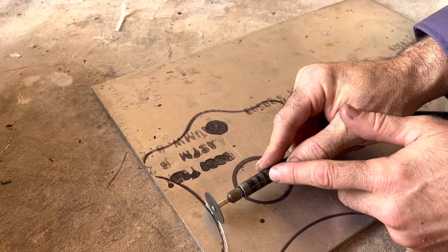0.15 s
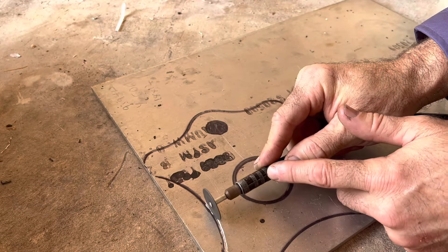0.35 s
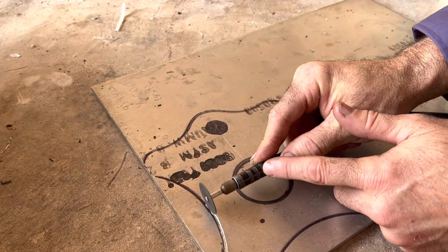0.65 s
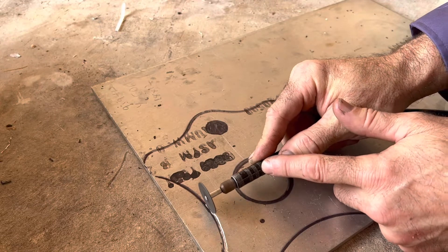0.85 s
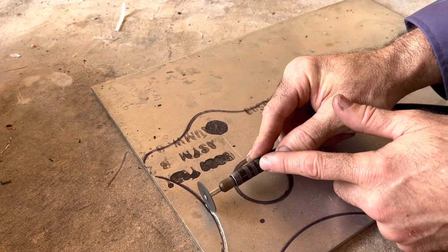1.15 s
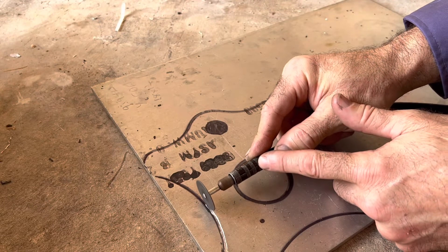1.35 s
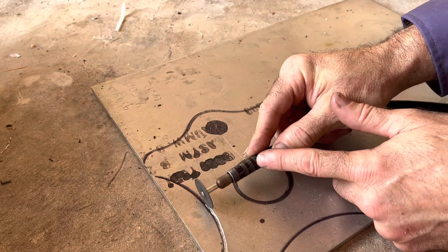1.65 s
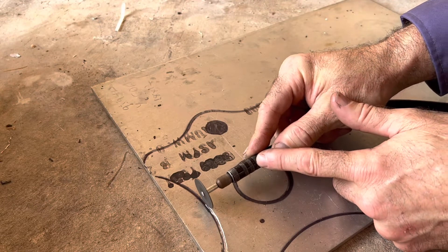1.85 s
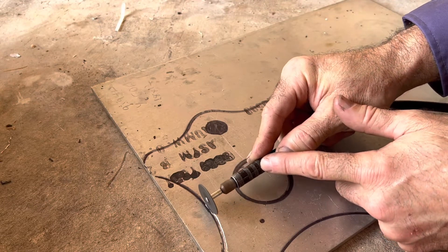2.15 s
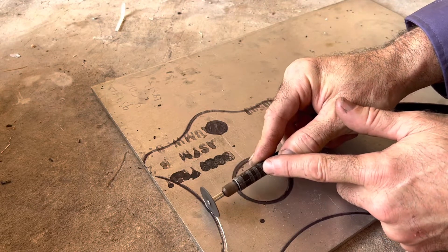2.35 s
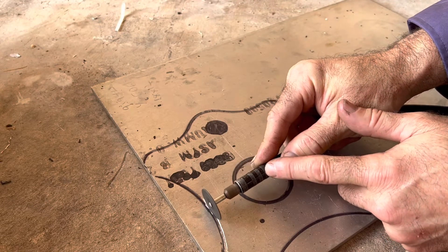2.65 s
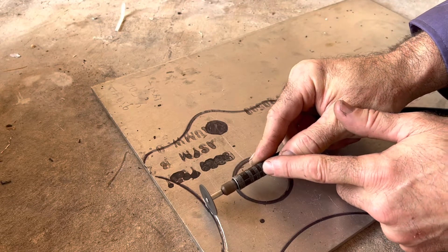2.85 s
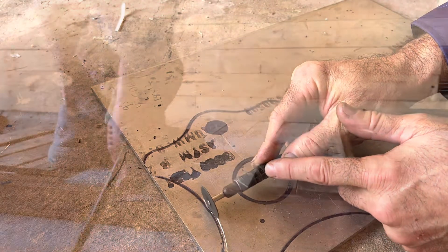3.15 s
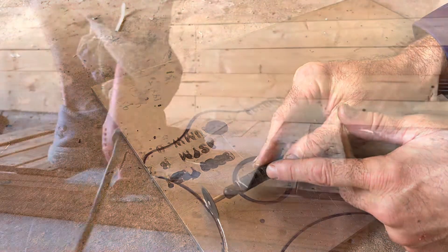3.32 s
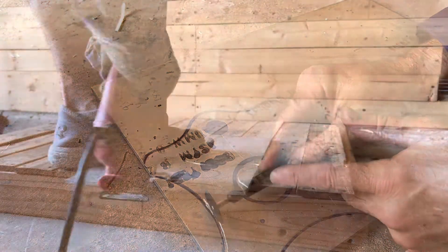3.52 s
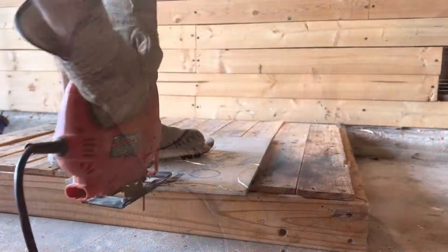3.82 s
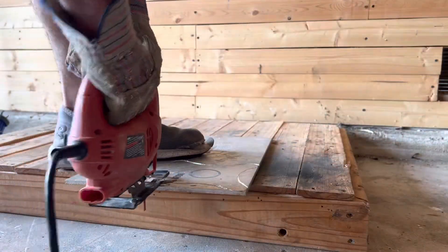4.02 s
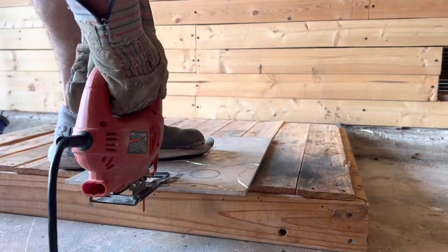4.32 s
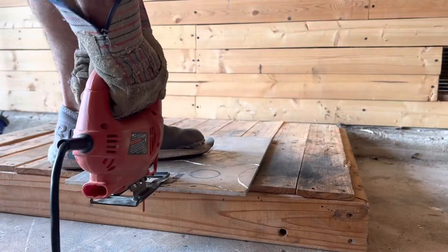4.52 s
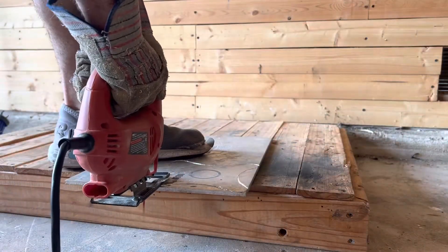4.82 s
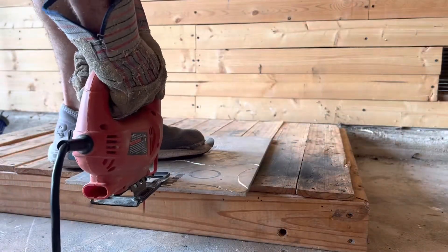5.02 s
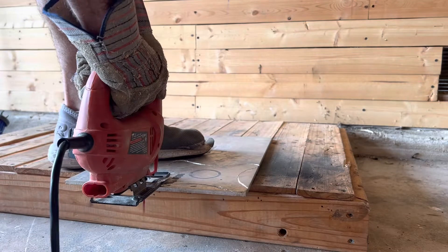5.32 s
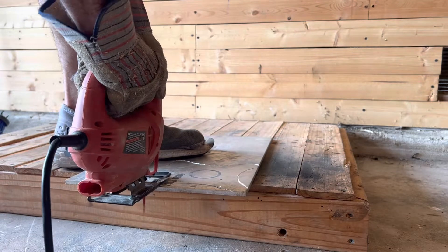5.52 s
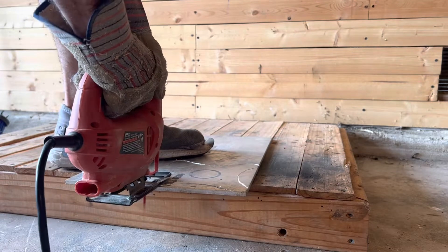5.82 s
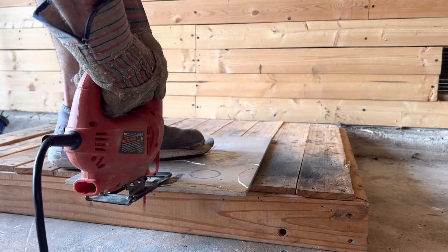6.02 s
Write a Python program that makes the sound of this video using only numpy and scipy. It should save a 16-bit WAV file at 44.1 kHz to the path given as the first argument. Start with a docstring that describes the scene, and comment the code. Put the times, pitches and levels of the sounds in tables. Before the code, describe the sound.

A rotary tool cuts metal for over three seconds: steady bright hiss, metallic ringing and a whine that wobbles under pressure. It dissolves into low room rumble, dull thuds and a short shoe scrape. A jigsaw then bursts in, speeding up into a coarse, rattling buzz with squawks and slaps, close by in a wooden room.

```python
"""A small wooden workshop, heard from close by through a phone's pair of microphones, over a low room rumble.
A rotary tool's disc grinds a groove in an aluminium sheet: strikes once a turn, grit noise and ringing modes
make it whine and chatter, then fade away. A jigsaw is set on the sheet, which lies on a wooden pallet: noise
bursts make its shoe bump and slide and its trigger click, then blows and rasping noise follow its strokes."""
import sys
import numpy as np
from scipy import signal
from scipy.fft import rfft, irfft, next_fast_len
from scipy.io import wavfile
from scipy.ndimage import uniform_filter1d

SR = 44100
rng = np.random.default_rng(int(sys.argv[2]) if len(sys.argv) > 2 else 0)


def master_out(mix):
    """Clip the mix to full scale and print it as 16-bit PCM to the path in sys.argv[1]."""
    frames = np.transpose(np.atleast_2d(mix))
    ceiling = np.clip(frames, -1, 1)
    pcm = np.round(ceiling * 32767).astype(np.int16)
    wavfile.write(sys.argv[1], SR, pcm)


N = 272097
T = np.arange(N) / SR  # seconds
SIZE = next_fast_len(N + SR // 2, True)  # transform length, with room for tails
HZ = np.maximum(np.arange(SIZE // 2 + 1) * SR / SIZE, 1)


def undb(db):
    """Decibels to gain."""
    return 10 ** (np.asarray(db) / 20)


def unit(x):
    """Scale to rms 1."""
    return x / np.sqrt(np.mean(x ** 2))


def curves(rows):
    """One value a sample for each column of a table after its first, the seconds."""
    s, *columns = np.transpose(rows)
    return [np.interp(T, s, column) for column in columns]


def shape(points):
    """Gain at each frequency from (Hz, dB) points."""
    hz, db = np.transpose(points)
    return undb(np.interp(np.log(HZ), np.log(hz), db))


def mode_response(hz, width):
    """One damped mode with gain 1 at its peak."""
    return 1 / (1 + 1j * hz / width * (HZ / hz - hz / HZ))


def resonances(modes):
    """Damped modes added to a flat response."""
    return 1 + sum(undb(db) * mode_response(hz, width) for hz, width, db in modes)


def filtered(x, response):
    """Pass a sound through a frequency response."""
    return irfft(rfft(x, SIZE) * response, SIZE)[..., :N]


def noise():
    """White noise."""
    return rng.standard_normal(N)


def walk(rate):
    """Slow chance with spread near 1, drawn anew about rate times a second and smoothed."""
    k = max(int(SR / rate), 1)
    steps = np.repeat(noise()[:N // k + 1], k)
    return 1.36 * uniform_filter1d(uniform_filter1d(steps, k), k)[:N]


def pulses(turns):
    """A click each time the phase completes a turn, shared between two samples."""
    at = np.flatnonzero(np.diff(np.floor(turns)) > 0)
    late = (turns[at + 1] % 1) / (turns[at + 1] - turns[at])
    out = np.zeros(N)
    out[at], out[at + 1] = late, 1 - late
    return out


def swell(turns, depth):
    """A smooth bump once a turn; rms 1."""
    return unit(np.exp(depth * np.cos(2 * np.pi * turns)))


def fade(start, end):
    """Goes from 0 at start to 1 at end; falls over time where end comes first."""
    return np.clip((T - start) / (end - start), 0, 1)


def gate(start, length, edge):
    """Rises, holds and falls; each edge takes edge seconds."""
    rise = fade(start - edge / 2, start + edge / 2)
    return rise * (1 - fade(start + length - edge / 2, start + length + edge / 2))


def lifts(events, edge):
    """For each level column of (start, length, ..) rows, the summed lift over time."""
    return sum(np.outer(values, gate(start, length, edge)) for start, length, *values in events)


def burst(start, t60):
    """A spray of contact noise that dies by 60 dB in t60 seconds."""
    age = np.maximum(T - start, 0)
    return noise() * (T >= start) * np.exp(-np.log(1000) * age / t60)


def dispersed(x, spread=.2):
    """Bending waves in a sheet run faster at high pitch, so a click arrives as a short falling chirp."""
    return filtered(x, np.exp(-2j * np.pi * spread * np.sqrt(HZ)))


def partial(turns, waver_db):
    """A tone that wavers about rms 1."""
    return np.sqrt(2) * np.sin(2 * np.pi * (turns + rng.random())) * undb(waver_db * walk(14))


# Colour of the room's rumble. Each row: frequency in Hz, relative level in dB.
ROOM_COLOUR = [(20, -26), (45, -3.5), (70, 3), (130, -2), (220, -11.5), (500, -15), (1500, -26),
               (5000, -30.5), (16000, -55)]
# How loud the room stands behind the tools. Each row: time in seconds, level in dB.
ROOM_LEVEL = [(0, -60.5), (3.0, -61.5), (3.5, -48.5), (6.17, -58)]


def rumble():
    """Low room noise, nearly the same on both sides."""
    air = noise() + 0.3 * np.array([noise(), noise()])
    return unit(filtered(air, shape(ROOM_COLOUR))) * undb(curves(ROOM_LEVEL)[0] + 0.52 * walk(6.06))


def workshop(x, wet_db, t60, pan_db):
    """Wooden walls send a short unrelated tail to each side; deep bass and top treble stay direct."""
    tails = np.array([burst(.003, t60) for _ in range(2)])
    tails /= np.sqrt(np.sum(tails ** 2, axis=1, keepdims=True))
    wet = undb(wet_db) * shape([(100, -20.5), (400, 0.0), (1200, 1.5), (2500, 2.0),
                                (7200, -3.0), (8200, 10.0), (12000, -67)])
    sides = undb(np.array([[pan_db], [-pan_db]]) / 2)  # pan_db: left minus right
    return filtered(x, (1 + wet * rfft(tails, SIZE)) / np.sqrt(1 + wet ** 2 / 2)) * sides


# The steel shoe on the sheet. Each row: mode in Hz, width in Hz, relative level in dB.
SHOE_MODES = [(356, 22, 19), (712, 20, 16), (1061, 13, 10)]
# The shoe lands squarely and rings. Each row: start in seconds, peak in dB before the room, upper edge in Hz.
CLANGS = [(3.331, -23, 2000), (4.674, -6, 400), (4.728, -14, 400), (4.845, -19, 410), (5.972, -17, 400)]


def clang(start, edge_hz):
    """One clean ring of the shoe's modes; a softer landing holds back the upper ones."""
    age = np.maximum(T - start, 0)
    ring = 0
    for hz, width, db in SHOE_MODES:
        strength = undb(db) / np.hypot(1, (hz / edge_hz) ** 2)
        ring = ring + strength * np.exp(-np.pi * width * age) * np.sin(2 * np.pi * hz * age)
    ring = filtered(ring, 1 / (1 + 170 / (1j * HZ)) ** 2)  # the small shoe radiates little deep bass
    return ring / np.abs(ring).max()


def clangs():
    """All the shoe's rings, each at its own peak level."""
    return sum(undb(db) * clang(start, edge_hz) for start, db, edge_hz in CLANGS)


# The saw bumps on the sheet.
# Each row: start in seconds, peak in dB before the room, ring time in seconds, upper edge in Hz.
BUMPS = [(3.196, -37, .12, 349.7), (3.28, -23.5, 0.21, 300), (3.331, -20.5, 0.16, 700),
         (3.377, -27, 0.15, 200), (3.515, -38.5, .15, 201.6), (3.771, -33.5, 0.036, 650),
         (3.8, -35, 0.13, 450), (4.16, -34.5, 0.035, 550), (4.33, -40.5, 0.071, 900),
         (4.509, -41.5, 0.14, 500), (4.589, -26, 0.22, 504)]
# Colour of a bump. Each row: frequency in Hz, relative level in dB.
BUMP_COLOUR = [(20, -30), (45, -23), (90, -12), (150, 11), (300, -9.5), (700, -1), (1100, -0.5), (3000, 14)]
# Shoe and trigger clicks. Each row: start in seconds, relative level in dB.
CLICKS = [(3.499, -28.5), (4.103, -35), (4.505, -39), (4.603, -30)]
# The shoe slides on the sheet.
# Each row: start in seconds, length in seconds, level in dB, rise and fall time in seconds.
SLIDES = [(3.848, 0.51, -57.5, 0.045), (4.03, 0.06, -45, 0.052), (4.106, 0.068, -32.5, 0.01),
          (4.134, 0.077, -59, .08), (4.362, 0.29, -59, .05)]
# Colour of slides and clicks. Each row: frequency in Hz, relative level in dB.
SCRAPE_COLOUR = [(200, -11), (700, -11), (2000, 0.5), (4000, -7), (6000, -2.5), (9000, 3), (12000, -11.5),
                 (16000, -7.5)]


def handling(click_t60=0.011, click_db=3):
    """Noise bursts ring the shoe as the saw bumps and clicks; gated noise scrapes as it slides."""
    body, scrape, bumps = shape(BUMP_COLOUR) * resonances(SHOE_MODES), shape(SCRAPE_COLOUR), 0
    for start, db, t60, edge_hz in BUMPS:
        softness = 1 / (1 + 1.4j * HZ / edge_hz - (HZ / edge_hz) ** 2)
        bump = filtered(burst(start, t60), body * softness)
        bumps = bumps + undb(db) * bump / np.abs(bump).max()
    clicks = sum(undb(db + click_db) * burst(start, click_t60) for start, db in CLICKS)
    pushes = sum(undb(db) * gate(start, length, edge) for start, length, db, edge in SLIDES)
    slide = unit(filtered(noise() * undb(2.0 * walk(400)), scrape)) * pushes
    return bumps + slide + filtered(clicks, scrape)


# The blade squawks, mostly lower as the cut goes on. Each row: start in seconds, length in seconds,
# first pitch in Hz, last pitch in Hz, rate of its roughness in Hz, level in dB against the rasp.
SQUAWKS = [(4.651, 0.039, 1400, 1484, 150, -4), (4.7, 0.088, 2210, 2886, 451, -6),
           (4.776, .014, 2820, 2880, 100, 0), (4.808, 0.013, 3000, 3010, 100.3, 0),
           (4.82, .08, 2935, 2745, 600, -9), (4.935, .14, 1950, 2145, 449.6, -3.5),
           (5.054, 0.018, 2150, 2186, 150, 1), (4.95, 0.22, 850, 876, 100, -8.5),
           (5.16, 0.14, 2138, 2000, 649, -3.5), (5.2, .17, 1300, 1230, 299.3, -3.5),
           (5.3, .2, 1947, 1752, 499, -12), (5.33, 0.16, 1080, 979, 349.4, -4.5),
           (5.37, .12, 560.6, 601, 150, -7.5), (5.52, .11, 826, 718, 299, -3),
           (5.724, .24, 901, 912, 60.03, -6.5)]


def squawks(bite, flutter=1.68, rough=0.62, edge_s=0.051):
    """Short, rough, gliding tones of the flexing blade, pulsing with its strokes."""
    out = 0
    for start, length, first_hz, last_hz, rate, db in SQUAWKS:
        cycles = np.cumsum(np.interp(T, [start, start + length], [first_hz, last_hz])) / SR
        tone = np.sin(2 * np.pi * cycles + flutter * walk(rate))
        tone = unit(bite * (1 + rough * walk(rate)) * tone)
        out = out + tone * undb(db) * gate(start, length, min(edge_s, length / 2))
    return out


# The geared motor's whine. Each row: multiple of its shaft rate, level in dB at normal feed.
MOTOR_ORDERS = [(6, -34), (12, -34)]


def motor_whine(shaft, bite, flutter=0.2, waver_db=2):
    """Tones of the motor, gliding with its speed and shaken by each stroke."""
    out = 0
    for order, db in MOTOR_ORDERS:
        tone = partial(round(order) * shaft + flutter * walk(90), waver_db)
        out = out + undb(db) * unit(bite * tone)
    return out


# Low shaking of the saw. Each row: multiple of the stroke rate, relative level in dB.
SHAKE_ORDERS = [(2, -4.5), (3, -1.5), (4, -1), (5, 1), (6, -4), (7, -6)]


def shaking(strokes):
    """Harmonics of the stroke rate, each wavering in level and phase; rms 1."""
    out = 0
    for order, db in SHAKE_ORDERS:
        phase = 2 * np.pi * (round(order) * strokes + rng.random()) + 0.5 * walk(25)
        out = out + undb(db + 3.5 * walk(20)) * np.sin(phase)
    return unit(out)


# Saw speed. Each row: time in seconds, strokes per second in Hz.
STROKE_RATE = [(4.6, 24.73), (4.7, 28.5), (4.914, 36.9), (5.084, 41.2), (5.22, 41.25), (5.346, 40.85),
               (5.592, 36.8), (5.722, 36.9), (5.92, 36.7), (6.17, 35.8)]
# How hard the saw is fed into the sheet. Each row: time in seconds, feed in dB.
FEED = [(4.65, 1.5), (5.1, 0), (5.23, 1), (5.55, -0.8), (5.8, -4.5), (6.12, -6.5)]
# The blade snags and the saw jolts.
# Each row: start in seconds, length in seconds, lift of the knock in dB, lift of the rasp in dB.
JOLTS = [(4.668, 0.032, 4.5, -2), (4.73, 0.046, 4, -3), (5.535, 0.103, 5, 0.5), (5.64, 0.14, 4, 0),
         (5.92, 0.051, 3, 3.5), (6.15, .04, 2, 0)]
# The sheet jumps and slaps the pallet. Each row: start in seconds, relative level in dB.
SLAPS = [(4.791, -5), (4.822, -6), (4.852, -5), (4.879, 0.5), (4.908, -0.5), (4.934, -5), (5.012, -9),
         (5.457, -4), (5.479, -6), (5.5308, 0), (5.61, -3), (5.638, -1.5)]
# Colours of the saw's knock, rasp and chip hiss. Each row: frequency in Hz, relative level in dB.
KNOCK_COLOUR = [(20, -65), (50, -44), (85, -13), (125, -8), (200, 2), (280, 2), (450, 7), (620, -2),
                (1000, -5), (2500, -24), (6000, -55)]
RASP_COLOUR = [(20, -64), (300, -10), (550, -2), (900, -9.5), (1600, -5.5), (2200, -4), (3000, -5),
               (3450, -8), (3800, -12), (6000, -28), (12000, -31)]
CHIP_COLOUR = [(1500, -17), (3300, -5), (4100, -2), (5000, -1.5), (5800, 0), (7600, -4.5), (9000, -2),
               (10500, -3), (12000, -12.5), (16000, -20.5)]
# Sheet and pallet under the saw. Each row: mode in Hz, width in Hz, level in dB against the flat response.
BENCH_MODES = [(184, 17.6, 16.5), (355.6, 15, 15), (677, 41, -16), (910, 115, 6.5), (990, 10, -23.5),
               (1293, 117, 3.5), (1780, 50, -3), (2080, 140, -2.5), (2820, 180, -6), (3385, 86, 0.5),
               (6630, 110, -5)]
SLAP_T60_S = 0.038
FREE_HZ, LABOUR_HZ = 44.34, 8.2  # free-running stroke rate; drop at which the saw labours fully
FIRST_STROKE, MOTOR_RATIO = .77, 7.75  # starting phase in strokes; motor turns per stroke
# rasp, hiss and shake at normal feed (shake also at free speed); knock when labouring fully
RASP_DB, KNOCK_DB, HISS_DB, SHAKE_DB = -18.5, -25.5, -23.5, -28.5
HISS_PER_FEED, SHAKE_PER_FEED = 1, 1.5  # dB per dB of feed


def jigsaw(back_db=-3, rattle_db=2, both_bite=0.21, up_bite=0.25, grain_db=0.84, lumps_db=1.0,
           free_knock_db=-12, jolt_edge_s=0.0097, gear_db=-8, clack_db=-15, repeat_db=-5):
    """The blade knocks at both ends of its stroke and its teeth rasp in between; the geared motor buzzes along."""
    (stroke_hz,), (feed,) = curves(STROKE_RATE), curves(FEED)
    knock_lift, rasp_lift = lifts(JOLTS, jolt_edge_s)
    strokes = FIRST_STROKE + np.cumsum(stroke_hz) / SR + 0.0035 * walk(30)
    bench = resonances(BENCH_MODES)

    # a slow, labouring saw knocks more and bites harder on the upstroke
    labour = np.clip((FREE_HZ - stroke_hz) / LABOUR_HZ, 0, 1)
    bite = swell(strokes, up_bite * labour) * swell(2 * strokes, both_bite)
    bite = bite * undb(grain_db * walk(900) + lumps_db * walk(60))

    # the shoe lands, the blade turns back, and the sheet slaps the pallet in between
    blows = pulses(strokes) + undb(back_db) * pulses(strokes - .54) - 0.5 * pulses(strokes - .75)
    blows = unit(blows * undb(1.8 * walk(80)))

    # the same teeth pass on every stroke, so part of the rasp repeats and glides with the speed
    teeth = rng.standard_normal(1200)
    repeating = unit(np.interp(strokes, np.arange(len(teeth)) / len(teeth), teeth, period=1))
    scraping = unit((noise() + undb(repeat_db) * repeating) * bite)

    rattle = filtered(scraping, 1 / (1 + (260 / HZ) ** 3))
    knock = unit(filtered(dispersed(blows) + undb(rattle_db) * rattle, shape(KNOCK_COLOUR) * bench))
    gears = unit(pulses(MOTOR_RATIO * strokes) * bite)
    clatter = dispersed(undb(gear_db) * gears + undb(clack_db) * blows)
    rasp = unit(filtered(scraping + clatter, shape(RASP_COLOUR) * bench))
    chips = unit(filtered(noise() * bite, shape(CHIP_COLOUR) * bench))
    slaps = sum(undb(db) * burst(start, SLAP_T60_S) for start, db in SLAPS)
    slaps = filtered(slaps, shape(RASP_COLOUR) * bench)

    thumping = knock * undb(KNOCK_DB + free_knock_db * (1 - labour) + knock_lift)
    shake_gain = (stroke_hz / FREE_HZ) ** 2 * undb(SHAKE_DB + SHAKE_PER_FEED * feed)
    thumping = thumping + shaking(strokes) * shake_gain
    cutting = (rasp + squawks(bite)) * undb(RASP_DB + feed + rasp_lift)
    cutting = cutting + motor_whine(MOTOR_RATIO * strokes, bite) * undb(feed)
    cutting = cutting + chips * undb(HISS_DB + HISS_PER_FEED * feed)
    # the motor shakes the saw just before the teeth bite
    return slaps + thumping * fade(4.565, 4.68) ** 2 + cutting * fade(4.598, 4.662) ** 2


# Modes that sing as the disc moves along the cut.
# Each name: mode in Hz, half the width in Hz of each of two resonant passes.
SINGERS = {"low": (2215, 110), "middle": (2570, 200), "high": (3160, 190), "top": (4190, 110),
           "shrill": (5200, 130), "sizzle": (10300, 420)}
# The disc catches one of them. Each row: start in seconds, length in seconds, mode name, lift in dB.
SQUEALS = [(0.045, 0.12, "low", 14), (1, 0.054, "middle", 1), (2, 0.024, "low", 18), (0.1, 0.17, "high", 7),
           (0.44, 0.2, "middle", 0.5), (0.2, 0.07, "middle", 13), (0.85, 0.37, "high", 10),
           (1.3, 0.21, "middle", 10), (1.1, 0.28, "middle", 9), (3, 0.23, "low", 7),
           (1.504, 0.16, "high", 8), (1.12, 0.4, "top", 11), (2.8, .27, "top", 9), (3, .17, "middle", 5),
           (3.5, 0.48, "low", 12.5), (3, .25, "top", 8.5), (2.5, 0.31, "shrill", 12),
           (1.15, .72, "shrill", 5.5), (3, .73, "sizzle", 8), (3.5, .34, "sizzle", 19)]


def singing_modes(friction, low_db=-10.5, middle_db=-2, high_db=-2, top_db=-10, shrill_db=-8.0,
                  sizzle_db=-1, wander_db=3.0, edge_s=0.044):
    """Single modes come and go by chance and squeal when the disc catches them."""
    out = 0
    levels = (low_db, middle_db, high_db, top_db, shrill_db, sizzle_db)
    for (name, (hz, width)), db in zip(SINGERS.items(), levels):
        caught = sum(lift * gate(start, length, edge_s)
                     for start, length, mode, lift in SQUEALS if mode == name)
        loose = wander_db * walk(12) * undb(-caught)  # a caught mode holds steadier
        tone = unit(filtered(friction, mode_response(hz, 2 * width) ** 2))
        out = out + tone * undb(db + caught + loose)
    return out


# How far bouncing swings the whine upward. Each row: time in seconds, swing in bounce rates per harmonic.
SWING = [(.5, .3), (.7, .08), (.9, .05), (1.05, .25), (1.2, .5), (1.35, .88), (1.5, 1.25), (1.65, 1.47),
         (1.95, 1.35), (2.2, .15), (2.7, .2), (2.85, 0)]
# Colour of the disc's whine. Each row: frequency in Hz, relative level in dB.
WHINE_COLOUR = [(300, -31), (375, -12), (560, -9), (640, 0.5), (730, 3.5), (850, -5.5), (1000, -6),
                (1100, 2.5), (1290, 4), (1450, -6)]
# Level of the whine ahead of its colour. Each row: time in seconds, level in dB.
WHINE_LEVEL = [(.25, -67), (.5, -55), (.7, -51.5), (1.05, -46.5), (1.35, -47), (1.8, -46.5), (1.95, -55),
               (2.15, -69), (2.45, -64), (2.7, -47.5), (2.92, -52), (3.25, -50)]
# A drone of side tones below the second harmonic. Each row: frequency in Hz, relative level in dB.
DRONE_COLOUR = [(330, -34), (405, 1.5), (460, 2), (500, 0.5), (570, -25)]
# Level of that drone ahead of its colour. Each row: time in seconds, level in dB.
DRONE_LEVEL = [(.2, -66), (.33, -68), (1.15, -81), (1.4, -63), (1.7, -56), (2.0, -63), (2.55, -59.5),
               (2.7, -62.5), (2.8, -85)]
# Sharp modes of the sheet that pick out single harmonics.
# Each row: mode in Hz, width in Hz of each of two resonant passes, relative level in dB.
SHARP_MODES = [(1400, 67, -17.5), (1966, 80, -1.5), (2574, 140, -1), (3140, 190, -3.5), (3370, 66, -1.5),
               (4220, 120, -3), (4520, 110, -14), (4740, 130, -7)]


def disc_tones(shaft, bounce, spin, depth, side_fall_db=10, waver_db=2.0, hum_db=-59.5, smooth_db=-32,
               smooth_loss_db=28, smooth_waver_db=3.0):
    """The disc's clean tones: bouncing moves each harmonic's strength to a side tone above; a drone lies below."""
    (swing,) = curves(SWING)
    whine = 0
    for harmonic in range(1, 5):
        weights = undb(-side_fall_db * np.abs(np.arange(7)[:, None] - harmonic * swing))
        weights /= np.sqrt(np.sum(weights ** 2, axis=0))
        for side, weight in enumerate(weights):
            whine = whine + weight * partial(harmonic * shaft + side * bounce, waver_db)
    whine = filtered(whine, shape(WHINE_COLOUR)) * undb(curves(WHINE_LEVEL)[0])

    drone = sum(partial(2 * shaft - side * bounce, waver_db) for side in range(5))
    drone = filtered(drone, shape(DRONE_COLOUR)) * undb(curves(DRONE_LEVEL)[0])
    hum = partial(shaft, waver_db) * (spin / 300) ** 2 * undb(hum_db)  # unbalance grows with speed

    # when the disc runs smoothly, a high harmonic sings out whenever it crosses one of the sharp modes
    sharp = sum(undb(db) * mode_response(hz, width) ** 2 for hz, width, db in SHARP_MODES)
    upper = filtered(sum(partial(harmonic * shaft, smooth_waver_db) for harmonic in range(5, 19)), sharp)
    return whine + drone + hum + upper * undb(smooth_db - smooth_loss_db * depth)


def drifting(x, spread_hz, rate=11):
    """Lets a resonance drift up and down in pitch."""
    turns = np.cumsum(spread_hz * walk(rate)) / SR
    return np.real(signal.hilbert(x, SIZE)[:N] * np.exp(2j * np.pi * turns))


# Sheet resonances under the disc. Each row: mode in Hz, width in Hz, level in dB against the direct force.
SHEET_MODES = [(1278, 60.4, 6), (1983, 90, -1.5), (4170, 150, -1.5), (5224, 200, 1.5), (5590, 170, 4),
               (7250, 98, 6), (8400, 12.8, 3), (8980, 220, -1.5), (11120, 20.3, 12.5), (12000, 29.8, 18.5),
               (15600, 74.7, 11)]


def sheet_sound(force, drift_share, wander_db):
    """Each mode drifts, and couples more or less, as the contact point moves."""
    out = force
    for hz, width, db in SHEET_MODES:
        mode = filtered(force, undb(db) * mode_response(hz, width))
        out = out + drifting(mode, drift_share * width) * undb(wander_db * walk(8.98))
    return out


# Disc speed; pressed harder, it turns slower and bounces faster.
# Each row: time in seconds, turns per second in Hz, bounces per second in Hz.
DISC_SPEED = [(0, 252, 53), (.16, 256.3, 53), (.36, 305.9, 47), (.7, 320, 45), (.9, 327.4, 40),
              (1.05, 335.3, 38.5), (1.2, 335.5, 41.5), (1.35, 324.5, 42), (1.5, 311, 42.5), (1.65, 295, 45),
              (1.8, 278, 47.5), (1.95, 263, 51), (2.35, 236.8, 59.5), (2.6, 236.5, 59), (2.7, 249, 51),
              (2.8, 277.1, 48), (2.9, 284.6, 48), (3.07, 277.6, 48), (3.27, 231.6, 55), (3.9, 242.4, 57)]
# How much the disc bounces in the groove. Each row: time in seconds, depth from 0 to 1.
BOUNCE_DEPTH = [(.4, 0.78), (.8, 0.3), (1.15, 0.9), (1.7, 1), (2.0, 0.72), (2.65, 0.68), (2.82, 0.07),
                (3.25, 0.23), (3.4, 1)]
# How firmly the disc grinds. Each row: time in seconds, level in dB.
CONTACT = [(0, 0.5), (.9, -1), (1.7, 0.5), (2.2, -0.5), (2.7, 0), (3.02, -1), (3.2, -6), (3.56, -11.5),
           (3.6, -13.5), (3.72, -14.5), (3.83, -24.5), (3.9, -42)]
# The edge bites, throwing grit or ringing the sheet.
# Each row: start in seconds, length in seconds, lift of the grit in dB, lift of the sheet's ring in dB.
BITES = [(.345, 0.085, 4, -5.5), (.48, 0.26, 0.5, 1), (.84, 0.05, 2, 0), (1.01, 0.071, 2, 0.5),
         (1.12, 0.32, 0, 2.5), (1.46, 0.12, 1.5, 1), (1.93, 0.062, 4.5, 6), (2.06, 0.13, 4.5, 1.5),
         (2.19, 0.3, 0.5, 1), (2.78, 0.11, 3, -2), (2.88, 0.25, 2, -2.5), (3.36, 0.053, 6, -5.5)]
# Colour of grit on the sheet. Each row: frequency in Hz, relative level in dB.
GRIT_COLOUR = [(200, -32), (600, -22), (1300, -12), (1900, -4), (2500, -2), (3100, -4), (3700, -5),
               (5800, -4), (6700, -8), (7800, -6), (9000, 6.5), (10300, 3.5), (12400, -17.5), (13800, -8),
               (14900, 5.5), (16000, -18)]
GRIT_DB, RING_DB, SING_DB = -23, -28, -38  # at contact 0 dB, before lifts
SKIP_S, SKIP_LENGTH_S, SKIP_DEPTH = 3.37, .27, .85  # the disc skips out of the groove


def rotary_tool(bounce_grip=1.76, bounce_grit=0.02, turn_grit=0.18, drag=0.061, grain_db=-0.5, strike_db=1,
                chatter_db=-9, wander_db=2.0, grit_waver_db=0.5, ring_waver_db=1.0, bite_edge_s=0.11,
                drift_share=.3):
    """The disc's high spot strikes the sheet once a turn; bouncing splits the whine into side tones, chops the grit."""
    (spin, bounce_hz), (depth,), (contact,) = curves(DISC_SPEED), curves(BOUNCE_DEPTH), curves(CONTACT)
    grit_lift, ring_lift = lifts(BITES, bite_edge_s)
    shaft = np.cumsum(spin * (1 + 0.001203 * walk(40))) / SR
    bounce = np.cumsum(bounce_hz * (1 + 0.0205 * walk(20))) / SR
    # every bounce brakes the disc a little
    turns = shaft + drag * depth * np.sin(2 * np.pi * bounce)

    grip = bounce_grip * depth
    grip_swell = np.exp(grip * np.cos(2 * np.pi * bounce)) / np.sqrt(np.i0(2 * grip))
    strikes = unit(pulses(turns) * undb(0.39 * walk(300) + 1.7 * walk(18)) * grip_swell)

    # the grit is chopped hardest when the disc skips out of the groove
    chop = bounce_grit * depth + SKIP_DEPTH * gate(SKIP_S, SKIP_LENGTH_S, bite_edge_s)
    grains = unit(noise() * swell(turns, turn_grit) * swell(bounce, chop) * undb(grain_db * walk(1500)))

    # a disc that runs smoothly drives the sheet more regularly than one that bounces
    regular = undb(strike_db + chatter_db * depth)
    force = (grains + regular * dispersed(strikes)) / np.sqrt(1 + regular ** 2)
    sheet = sheet_sound(force, drift_share, wander_db)

    # below about 6700 Hz the sheet's ring, above it the grit
    bright = 1 / (1 + (6700 / HZ) ** 12)
    ring = unit(filtered(sheet, shape(GRIT_COLOUR) * (1 - bright)))
    ring = ring * undb(RING_DB + ring_lift + ring_waver_db * walk(16))
    grit = unit(filtered(sheet, shape(GRIT_COLOUR) * bright))
    grit = grit * undb(GRIT_DB + grit_lift + grit_waver_db * walk(16))
    singing = singing_modes(grains) * undb(SING_DB)
    scraping = (ring + grit + singing) * undb(contact) * fade(3.92, 3.84)
    return scraping, disc_tones(shaft, bounce, spin, depth) * fade(3.6, 3.1)


def scene():
    """Both tools and the handling, in the workshop; the disc's tones come more directly than the sheet's ringing."""
    sawing = workshop(jigsaw() + handling() + clangs(), wet_db=-5.5, t60=0.42, pan_db=1.23)
    scraping, tones = rotary_tool()
    grinding = workshop(scraping, wet_db=4.0, t60=0.088, pan_db=0.13)
    grinding = grinding + workshop(tones, wet_db=-2, t60=0.074, pan_db=0.0)
    return rumble() + sawing + grinding


# Microphone pair. Each row: frequency in Hz, left minus right in dB.
PORT_BALANCE = [(150, -0.5), (450, 0.3), (1000, 3), (2300, 1), (3300, 1.5), (5200, 8), (7000, 4.5),
                (7900, 1), (10000, -0.5)]
# Phase between the pair. Each row: frequency in Hz, half turns by which the right lags.
PORT_PHASE = [(300, 0), (2000, .1), (3100, .35), (4200, .1), (7500, .15), (8500, 0), (9900, -1),
              (10800, -1), (11500, -2), (12500, -2), (13300, -3), (14100, -3), (15200, -4)]
TOP_HZ = 15800  # upper edge of the microphones' band


def record(dry):
    """The left port is brighter; in the top treble the two channels turn in and out of phase."""
    hz, half_turns = np.transpose(PORT_PHASE)
    lean = np.sqrt(shape(PORT_BALANCE))
    ports = np.array([lean, np.exp(-1j * np.pi * np.interp(HZ, hz, half_turns)) / lean])
    sound = np.clip(filtered(dry, ports), -1, 1)
    return signal.sosfilt(signal.ellip(10, .2, 80, TOP_HZ, fs=SR, output="sos"), sound)


dry = scene()
out = record(dry)
master_out(out)
```